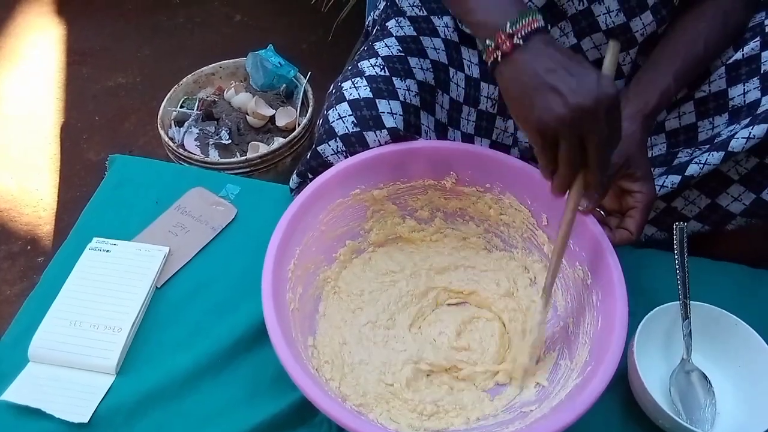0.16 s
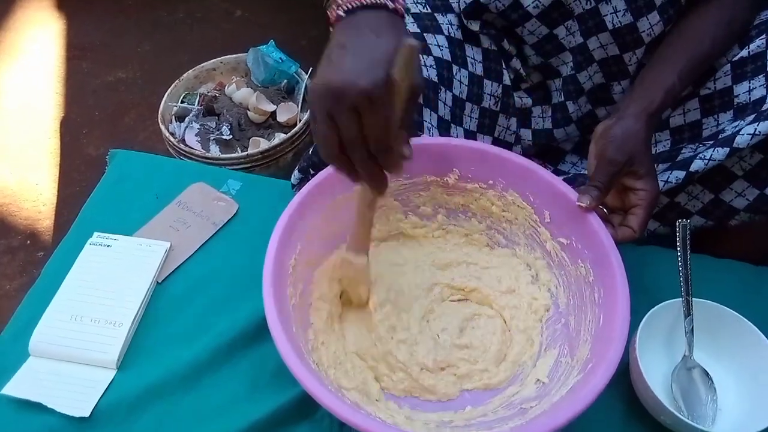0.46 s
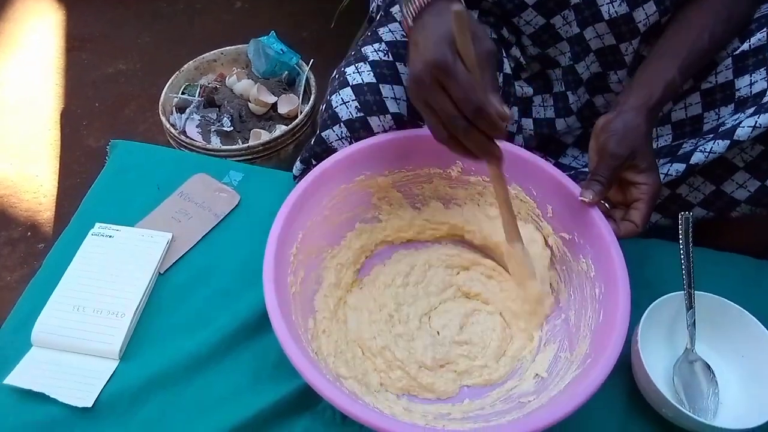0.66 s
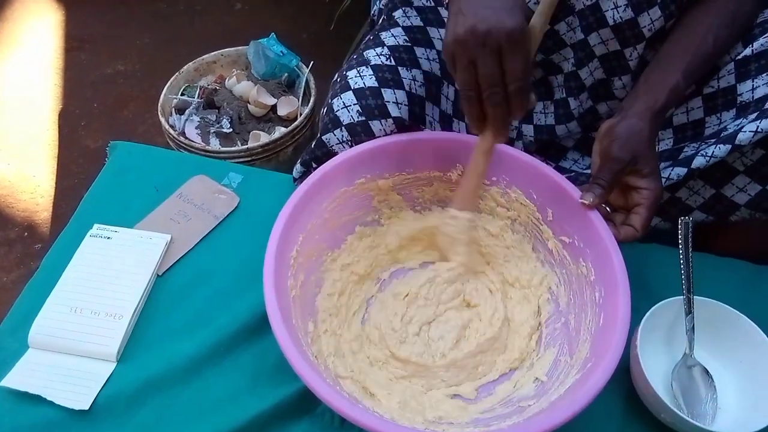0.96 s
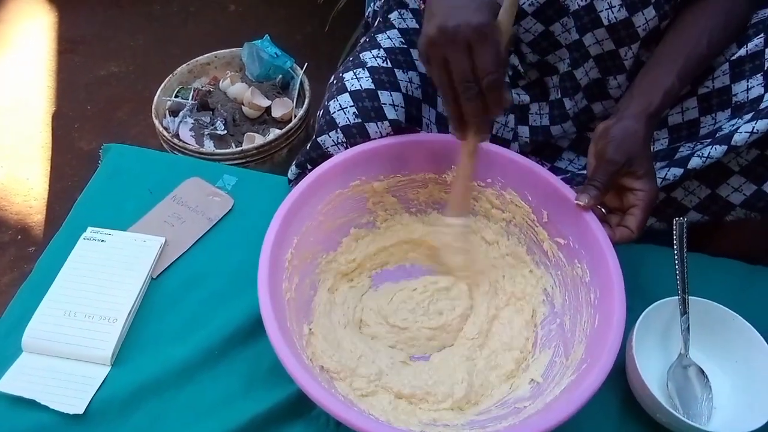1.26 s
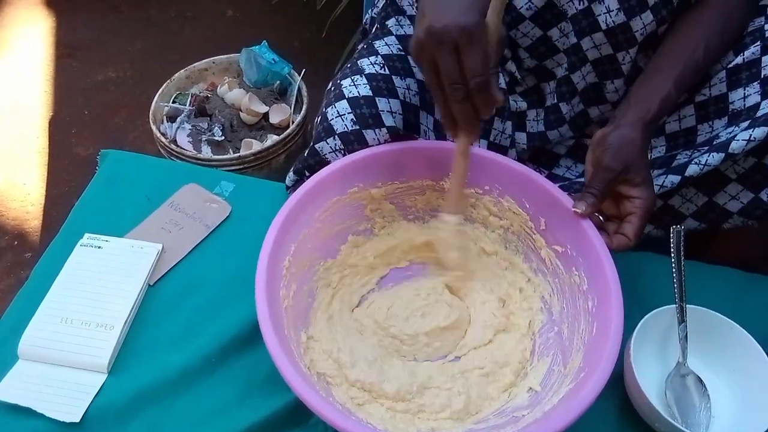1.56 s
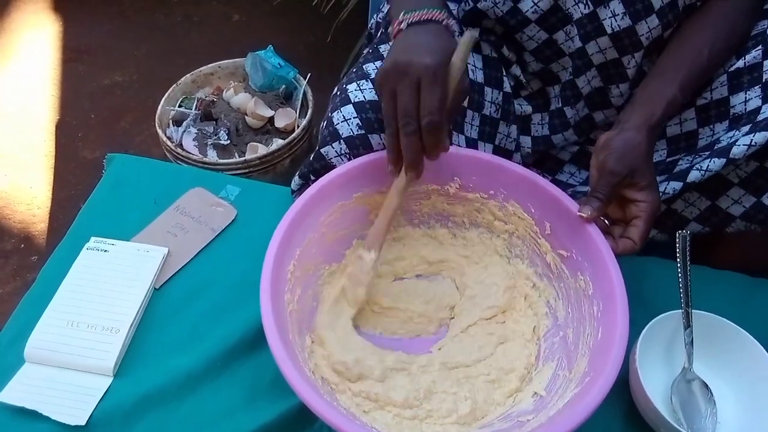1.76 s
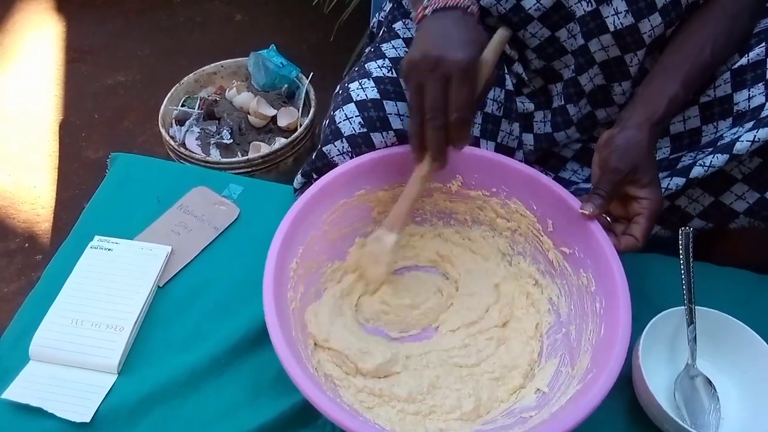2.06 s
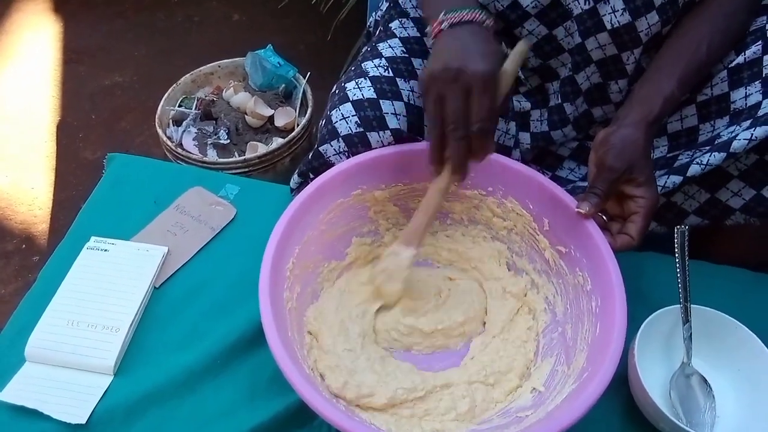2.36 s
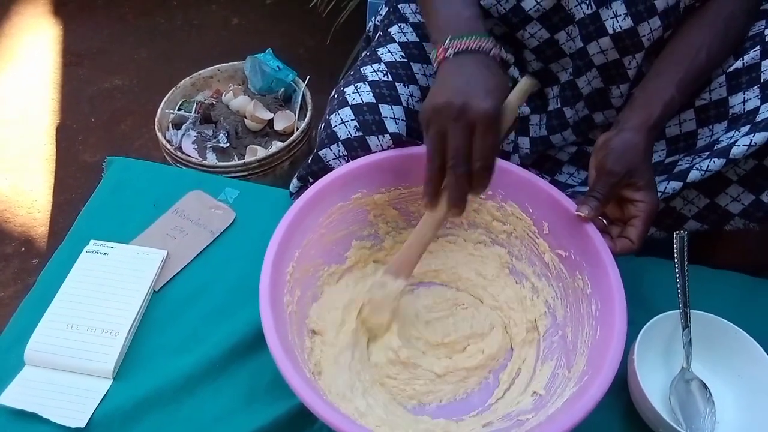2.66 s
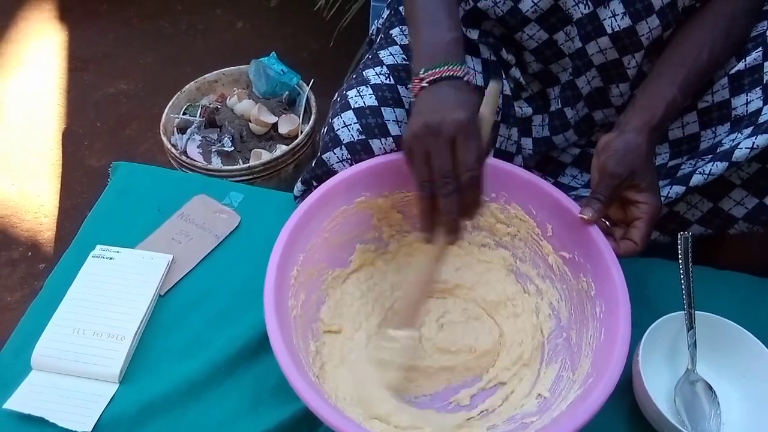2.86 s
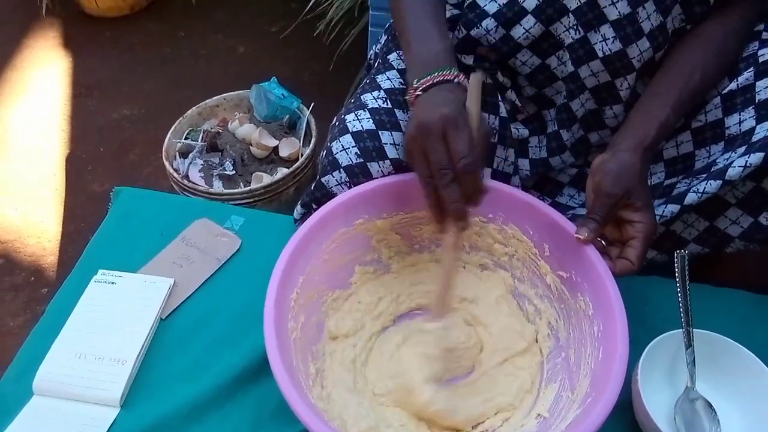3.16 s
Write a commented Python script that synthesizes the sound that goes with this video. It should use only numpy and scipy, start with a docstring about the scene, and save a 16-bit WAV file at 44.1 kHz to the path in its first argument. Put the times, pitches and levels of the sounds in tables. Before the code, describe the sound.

A wooden spoon beats thick batter in a plastic bowl, with wet squelches, snaps and knocks.

```python
"""A wooden spoon beats thick batter in a plastic bowl outdoors, close to a small microphone.
Throughout: yard air, low rumble, and drags of the spoon as coloured grains (rasp, squelch, hiss).
From a quarter second on, knocks ring the bowl's modes and batter tears off in snaps: ring, tick, spatter.
Then the rumble swells as the bowl is pushed on the table, and air pockets pop as short sliding rings.
Later, two squeaks of wet wood on plastic: swept, wobbling sines."""
import sys
import numpy as np
from scipy import signal
from scipy.io import wavfile

SR = 44100
rng = np.random.default_rng(int(sys.argv[2]) if len(sys.argv) > 2 else 0)


def materialize(psi):
    """Save the field psi as 16-bit PCM at rate SR to the path in sys.argv[1].

    A 1-D psi becomes a single channel; in a 2-D psi each row is a channel.
    """
    bounded = np.clip(np.atleast_2d(psi).T, -1, 1)
    quanta = np.round(bounded * 32767).astype(np.int16)
    wavfile.write(sys.argv[1], SR, quanta)


def boost(x):
    """Linear amplitude factor 10**(x/20) for a level x in decibels (scalar or array-like)."""
    u = np.asarray(x, float) / 20
    return 10 ** u


N = 145530

# spectrum of tearing, rasping batter: (frequency [Hz], relative density [dB per Hz])
CRACKLE = [(880, 1.5), (1500, 4), (1900, -8.5), (2680, 1.5), (4170, 13), (4800, 7), (8000, -64.5),
           (10400, -75)]
# spectrum of the spoon's treble hiss: (frequency [Hz], relative density [dB per Hz])
RUB = [(3820, -13), (6500, 24), (7160, -58), (9670, 25), (13700, -49), (15800, -3.5)]
# batter grains, in rasp and spatter alike
BATTER_GRAINS_PER_S, BATTER_CLUMP_DB = 8000, 2.5


def rms_one(x):
    """Scale to rms 1."""
    return x / np.sqrt(np.mean(x ** 2) + 1e-20)


def band(x, low_hz, high_hz):
    """Butterworth band-pass."""
    high_hz = min(high_hz, 0.45 * SR)
    return signal.sosfilt(signal.butter(2, [low_hz, high_hz], "band", fs=SR, output="sos"), x)


def two_pole(x, corner_hz, rate_hz):
    """Low-pass with a double real pole; rate_hz is the sample rate of x."""
    r = np.exp(-2 * np.pi * corner_hz / rate_hz)
    return signal.lfilter([1], [1, -2 * r, r * r], x)


def decay(x, time_s):
    """Each click in x starts an exponential decay with time constant time_s."""
    return signal.lfilter([1], [1, -np.exp(-1 / (time_s * SR))], x)


def drift(corner_hz):
    """Slow random wander of rms 1: low-passed noise, made at a tenth of the sample rate."""
    slow = two_pole(rng.standard_normal(N // 10 + 4002), corner_hz, SR / 10)
    slow = rms_one(slow[4000:])  # skip the filter's start
    return np.interp(np.arange(N) / 10, np.arange(len(slow)), slow)


def colour(x, spectrum, patch_db=0):
    """Third-octave bank shaped to the spectrum, gains wandering by patch_db; rms 1."""
    patch_corner_hz = 32
    hz, db = np.transpose(spectrum)
    x = np.atleast_2d(x)
    edges = 30 * 2 ** np.arange(0, 9.4, 1 / 3)
    out = np.zeros(N)
    for k, (low, high) in enumerate(zip(edges, edges[1:])):
        centre = np.sqrt(low * high)
        if not hz[0] * 0.8 < centre < hz[-1] * 1.2:
            continue
        gain_db = np.interp(np.log(centre), np.log(hz), db)
        if patch_db:
            gain_db = gain_db + patch_db * drift(patch_corner_hz)
        row = x[k % len(x)]  # rows are dealt to the bands in turn
        out += boost(gain_db) * band(row, low, high) * (-1) ** k
    return rms_one(out)


def grains(per_s, clump_db):
    """Tiny random breaks of uneven size, in clumps; three rows, for bands of their own."""
    spread_db, clump_corner_hz = 3.5, 45
    sizes = boost(spread_db * np.minimum(rng.exponential(1, N), 4)) * rng.choice([-1, 1], N)
    clicks = sizes * (rng.random(N) < per_s / SR) * boost(clump_db * drift(clump_corner_hz))
    kind = rng.integers(0, 3, N)
    return clicks * (kind == np.arange(3)[:, None]) + 1e-18


def blips(rows, cycles, rise):
    """Each row a short ring that swells to its peak at the row's time, dies and slides in pitch."""
    out, t = np.zeros(N + SR), np.arange(1500) / SR
    for s, db, hz in rows:
        phase = rng.uniform(0, 2 * np.pi)
        x = 8 * t * hz / cycles
        swell = (x / 2) ** 2 * np.exp(2 - x)  # peaks at x = 2
        slide = 1 + rise * (x / 8 - 0.25)
        i = int((s - cycles / hz / 4) * SR)
        out[i:i + len(t)] += boost(db) * swell * np.sin(2 * np.pi * hz * t * slide + phase)
    return out[:N]


def background():
    """Yard air as coloured noise, and a low noise rumble that swells with each push of the bowl."""
    # yard air spectrum: (frequency [Hz], relative density [dB per Hz])
    air_spectrum = [(35, -51), (60, -23), (694, -9.5), (2030, -15.5), (2750, -9), (6070, -17), (8220, -72),
                    (15800, -36.5)]
    # bowl pushed against the table: (time [s], rumble level [dB]); the swell peaks push_s later
    push_rows = [(0.387, -56.5), (0.949, -57), (1.318, -63), (2.298, -54), (2.359, -72), (2.719, -65),
                 (3.199, -62)]
    air_db, rumble_floor_db, push_s = -64.5, -73, 0.027
    t = np.arange(N) / SR
    swell = np.full(N, boost(rumble_floor_db))
    for s, db in push_rows:
        swell += boost(db) * np.exp(-((t - s - push_s) / push_s) ** 2)
    rumble = rms_one(band(rng.standard_normal(N), 50.3, 113.3))
    air = colour(rng.standard_normal((2, N)), air_spectrum, patch_db=-1.0)
    return boost(air_db) * air + swell * rumble


def strokes():
    """Each drag: a rasp of dense grains, a duller squelch and a thin hiss under one envelope."""
    # drags: (start [s], length [s], rasp level [dB], squelch level [dB], hiss level [dB])
    stroke_rows = [(0, 0.051, -58.5, -60, -77), (0.242, 0.045, -57.5, -62, -71),
                   (0.282, 0.14, -46, -53.5, -61.5), (0.422, 0.15, -56, -63.5, -99),
                   (0.549, 0.15, -50.5, -60, -101), (0.68, 0.12, -49, -57.5, -71),
                   (0.791, 0.066, -47, -56.5, -71), (0.857, 0.092, -46, -55, -63),
                   (0.956, 0.077, -49.5, -61.5, -85), (1.037, 0.047, -51, -51, -67),
                   (1.086, 0.061, -52.5, -63.5, -67.5), (1.156, 0.087, -62, -56.5, -96),
                   (1.242, .13, -48.5, -54, -70), (1.388, 0.069, -55.5, -54, -70),
                   (1.447, 0.091, -44.5, -50, -81), (1.518, 0.07, -48, -52.5, -73),
                   (1.615, 0.062, -51, -57, -64), (1.701, 0.019, -57, -66, -77),
                   (1.742, 0.02, -45, -46.5, -68), (1.798, 0.049, -54, -46, -87),
                   (1.847, 0.069, -52.5, -59.5, -94), (1.972, 0.082, -59, -63.5, -96),
                   (2.058, 0.092, -50, -46, -67.5), (2.153, 0.069, -46, -54, -67),
                   (2.24, 0.034, -49, -57.5, -62.5), (2.303, 0.12, -47.5, -49.5, -66.5),
                   (2.439, 0.12, -49.5, -62.5, -69), (2.579, 0.15, -49, -56.5, -71),
                   (2.735, 0.15, -48.5, -60, -85), (2.834, 0.094, -58, -60.5, -74),
                   (2.917, 0.11, -41.5, -53, -56.5), (3.028, 0.15, -50.5, -60, -72),
                   (3.181, 0.11, -49.5, -57.5, -73)]
    # squelch spectrum: (frequency [Hz], relative density [dB per Hz])
    squelch_spectrum = [(88, -38), (150, 2), (306, -12), (356, 2.5), (3000, -6), (3900, -48)]
    attack_s, release_s, patch_db = 0.012, 0.023, 4.0
    t = np.arange(N) / SR
    gains = np.zeros((3, N))
    for s, length, *db in stroke_rows:
        rise = (t - s) / attack_s
        fall = (s + length - t) / release_s + 0.5  # half down at the stroke's end
        gains += boost(db)[:, None] * np.clip(np.minimum(rise, fall), 0, 1)
    rasp = colour(grains(BATTER_GRAINS_PER_S, BATTER_CLUMP_DB), CRACKLE, patch_db)
    squelch = colour(grains(per_s=3000, clump_db=3.5), squelch_spectrum, patch_db)
    hiss = colour(grains(per_s=12000, clump_db=4.0), RUB, patch_db)
    return gains[0] * rasp + gains[1] * squelch + gains[2] * hiss


def knocks():
    """A softened click per blow strikes every mode of the bowl with a strength of its own."""
    # spoon hits the bowl: (time [s], peak level [dB], hardness [0-1])
    knock_rows = [(0.2478, -26.5, 0.25), (0.282, -39, 0.57), (0.2895, -38, 0.24), (0.688, -45, 0.1),
                  (0.789, -40.5, 0.57), (0.9353, -31.5, 0.8), (1.202, -39, 0.74), (1.288, -33.5, 1),
                  (1.493, -45, 0), (1.572, -34.5, 0.35), (1.774, -34, 0.33), (1.8762, -35, 0.35),
                  (1.986, -44, 0.4), (2.04, -37, 0.45), (2.064, -22.5, 1), (2.1269, -26, 0.4),
                  (2.334, -41, 0.7), (2.587, -39.5, 0.2), (2.985, -31, 0.8), (2.9985, -26.5, 0.63),
                  (3.277, -43, 0.6), (3.288, -41.5, 0.2)]
    # bowl modes: (nominal frequency [Hz], relative level [dB], 60 dB decay time [s])
    bowl_modes = [(174, -11.5, 0.031), (237.3, -3, 0.073), (353, -8, 0.049), (482.3, 4.5, 0.061),
                  (615, 2.5, 0.034), (700, 3, 0.023), (960, 5, 0.032), (1185, 6, 0.022), (1480, 0.5, 0.044),
                  (2510, 8.5, 0.025)]
    soft_hz, hard_hz, mode_spread_db = 211, 4000, 3
    detune = 0.031  # relative; the batter load shifts the modes from blow to blow
    out, t = np.zeros(N + SR), np.arange(SR // 6) / SR
    hz, db, t60_s = np.transpose(bowl_modes)[:, :, None]
    sign = (-1.0) ** np.arange(len(bowl_modes))[:, None]
    for s, level_db, hard in knock_rows:
        strength, shift = rng.standard_normal((2, len(bowl_modes), 1))
        envelope = boost(db + mode_spread_db * strength - 60 * t / t60_s)
        rings = sign * envelope * np.sin(2 * np.pi * hz * (1 + detune * shift) * t)
        corner_hz = soft_hz * (hard_hz / soft_hz) ** np.clip(hard, 0, 1)
        blow = two_pole(rings.sum(axis=0), corner_hz, SR)
        i = int(s * SR)
        out[i:i + len(t)] += boost(level_db) * blow / np.abs(blow).max()
    return out[:N]


def snaps():
    """Batter tears off spoon and wall: a short ring, a wide tick and a dying spatter of grains."""
    # tears: (time [s], level [dB], ring frequency [Hz])
    snap_rows = [(0.2488, -28, 4480), (0.5847, -29.5, 3250), (0.6408, -32.5, 4440), (0.6592, -29.5, 4260),
                 (0.7414, -31, 4600), (0.748, -32, 4160), (0.793, -28, 4230), (0.8148, -24.5, 3920),
                 (0.8836, -27, 3340), (0.895, -32, 3180), (0.8999, -19, 3500), (0.905, -28, 3840),
                 (0.9143, -20.5, 3940), (0.9352, -26, 3370), (0.976, -28, 3900), (0.9792, -30, 4000),
                 (0.9817, -31, 3660), (0.9928, -29.5, 3950), (1.047, -29, 4320), (1.0645, -31, 4430),
                 (1.2905, -21.5, 4500), (1.4527, -24.5, 4500), (1.4556, -22, 4150), (1.46, -13, 4200),
                 (1.4632, -26, 4000), (1.4671, -31, 4130), (1.482, -26.5, 4160), (1.5311, -24, 3430),
                 (1.5425, -28, 4700), (1.74, -26, 5100), (1.7465, -33, 4400), (1.7522, -25.5, 3850),
                 (1.8317, -29.5, 4100), (1.9322, -23.5, 4650), (1.9546, -27, 4260), (2.0656, -29.5, 4160),
                 (2.0773, -31, 4370), (2.0908, -26.5, 3820), (2.1285, -30.5, 4500), (2.3399, -27, 4230),
                 (2.5258, -23.5, 3760), (2.6208, -31.5, 3210), (2.6801, -17.5, 4040), (2.7681, -22, 3680),
                 (2.8108, -32, 3640), (2.855, -30.5, 4180), (2.9194, -21, 4020), (2.9276, -32.5, 4130),
                 (3.0008, -24.5, 3970), (3.1497, -32.5, 4430)]
    tick_lead_s, tick_decay_s, tick_db, tick_treble_db = 0.0006, 0.0028, -13.5, -55
    spatter_db, spatter_decay_s = -26, 0.008
    s, db, _ = np.transpose(snap_rows)
    clicks = np.zeros(N)
    clicks[((s - tick_lead_s) * SR).astype(int)] = boost(db)
    white = rng.standard_normal(N)
    wide = boost(tick_db) * colour(white, CRACKLE) + boost(tick_treble_db) * colour(white, RUB)
    tick = decay(clicks, tick_decay_s) * wide
    batter = colour(grains(BATTER_GRAINS_PER_S, BATTER_CLUMP_DB), CRACKLE)
    spatter = boost(spatter_db) * decay(clicks, spatter_decay_s) * batter
    ring = band(blips(snap_rows, cycles=7.8, rise=0.017), 1500, 7000)
    return ring + tick + spatter


def pops():
    """Air pockets pop: each a short ring that slides up in pitch."""
    # pops: (time [s], peak level [dB], nominal frequency [Hz])
    pop_rows = [(0.571, -34, 1520), (0.603, -42, 1020), (0.747, -41, 1220), (0.874, -34.5, 1020),
                (0.885, -38.5, 1020), (1.064, -34.5, 840), (1.335, -33.5, 1020), (1.4825, -25.5, 2270),
                (1.5305, -23.5, 1890), (1.933, -38, 1270), (2.089, -35, 790), (2.091, -29.5, 2200),
                (2.22, -32, 960), (2.385, -40, 930), (2.519, -37, 1120), (2.591, -27.5, 1200),
                (2.682, -36.5, 930), (2.8, -38, 960), (2.847, -38.5, 880), (2.865, -31, 813),
                (2.92, -24.5, 2640), (3.071, -37.5, 1560), (3.151, -37, 950), (3.224, -41.5, 1300),
                (3.262, -37.5, 810)]
    return blips(pop_rows, cycles=4.7, rise=0.047)


def squeaks():
    """Wet wood squeaks on plastic: brief unsteady tones that slide as the contact moves."""
    # squeaks: (start [s], length [s], peak level [dB], from [Hz], to [Hz])
    squeak_rows = [(1.813, 0.033, -45, 1270, 1313), (2.41, 0.058, -56, 3490, 2405)]
    t = np.arange(N) / SR
    wobble = 1 + 0.04 * drift(corner_hz=128)
    out = np.zeros(N)
    for s, length, db, from_hz, to_hz in squeak_rows:
        x = np.clip((t - s) / length, 0, 1)
        pitch_hz = (from_hz + (to_hz - from_hz) * x) * wobble
        out += boost(db) * np.sin(np.pi * x) * np.sin(2 * np.pi * np.cumsum(pitch_hz) / SR)
    return out


def scene():
    """Bowl sounds with near echoes off table and body, over the background."""
    # echoes: (delay [s], level [dB])
    echo_rows = [(.003, -20), (.0074, -23)]
    bowl = strokes() + knocks() + snaps() + pops() + squeaks()
    echo = sum(boost(db) * np.pad(bowl, (int(s * SR), 0))[:N] for s, db in echo_rows)
    return (bowl + echo + background())[None]


def band_limit(x):
    """A steep low-pass at the top of the band."""
    return signal.sosfilt(signal.butter(12, 16890, fs=SR, output="sos"), x)


def record(dry):
    """The microphone drops the deep bass and the very top."""
    x = signal.sosfilt(signal.butter(3, 64, "high", fs=SR, output="sos"), dry)
    x = signal.sosfilt(signal.cheby2(12, 50, 16300, fs=SR, output="sos"), x)
    return band_limit(x)


dry = scene()
out = record(dry)
materialize(out)
```